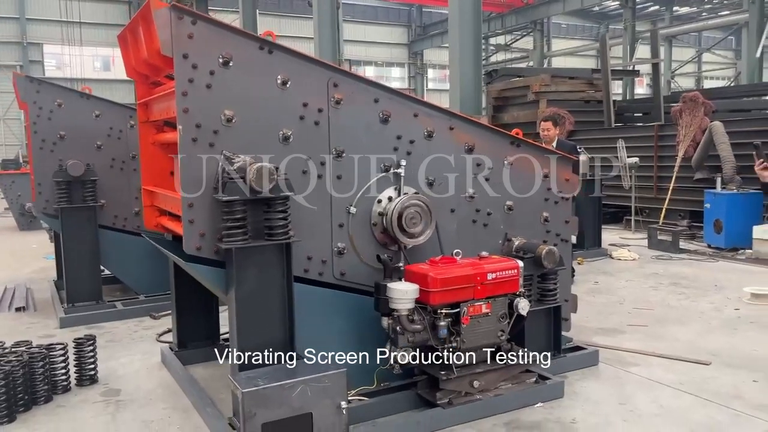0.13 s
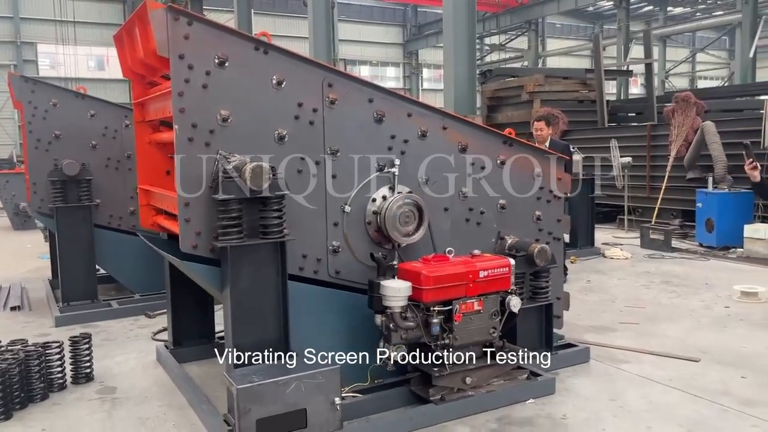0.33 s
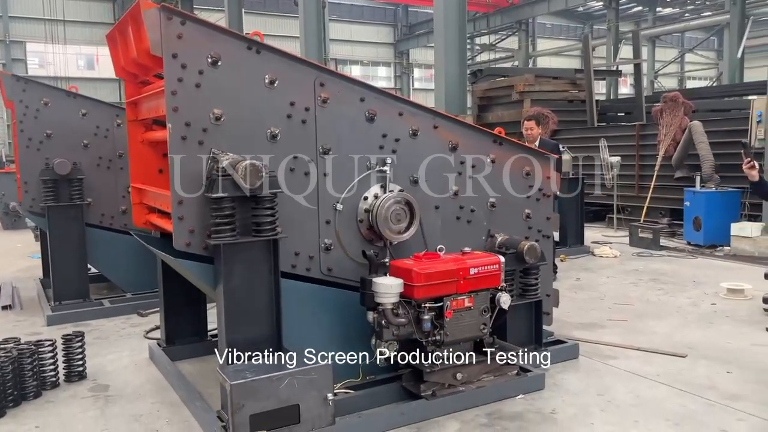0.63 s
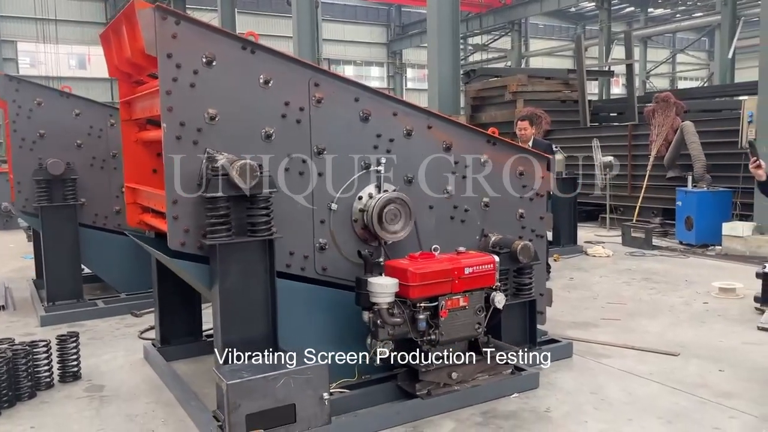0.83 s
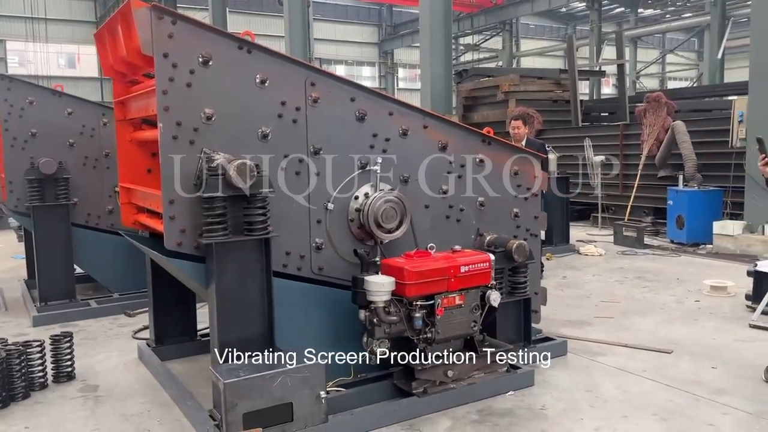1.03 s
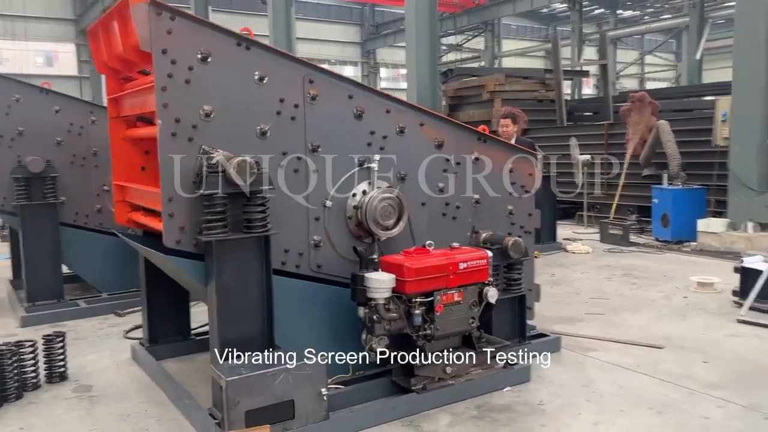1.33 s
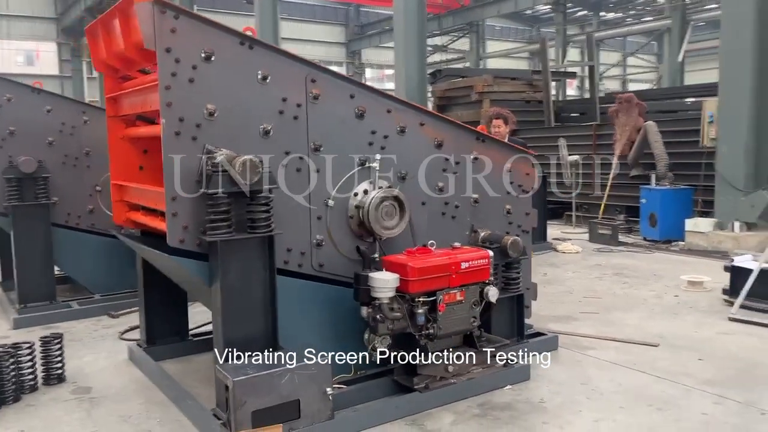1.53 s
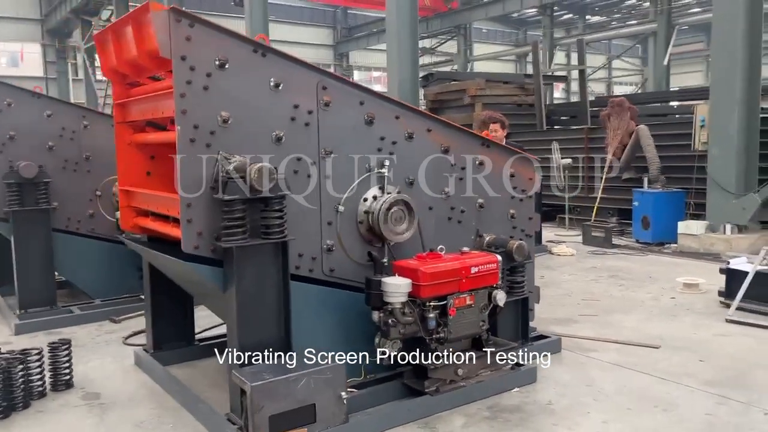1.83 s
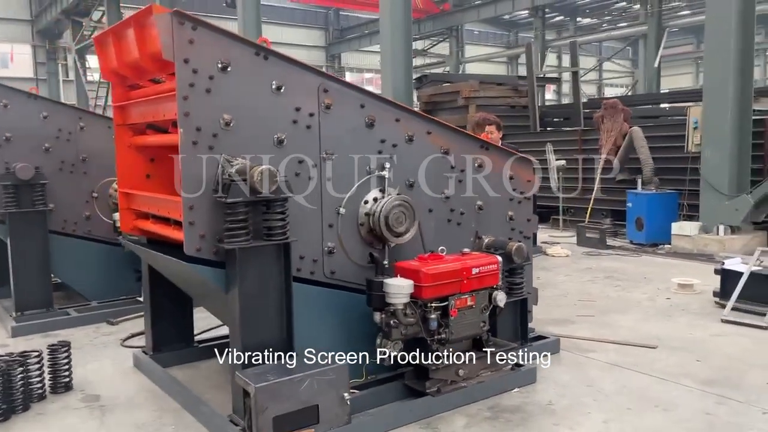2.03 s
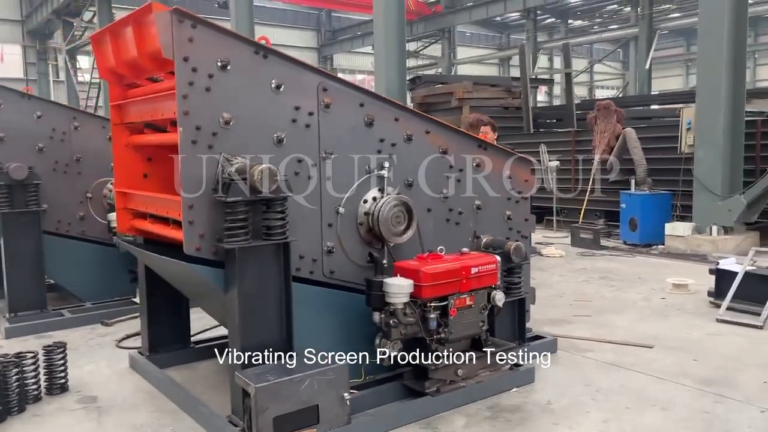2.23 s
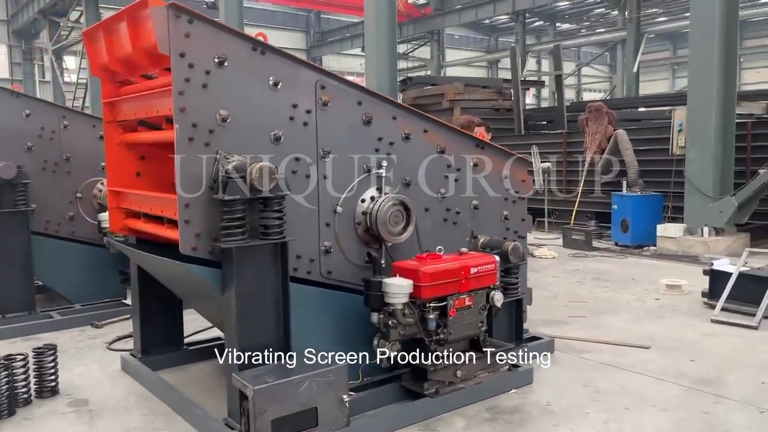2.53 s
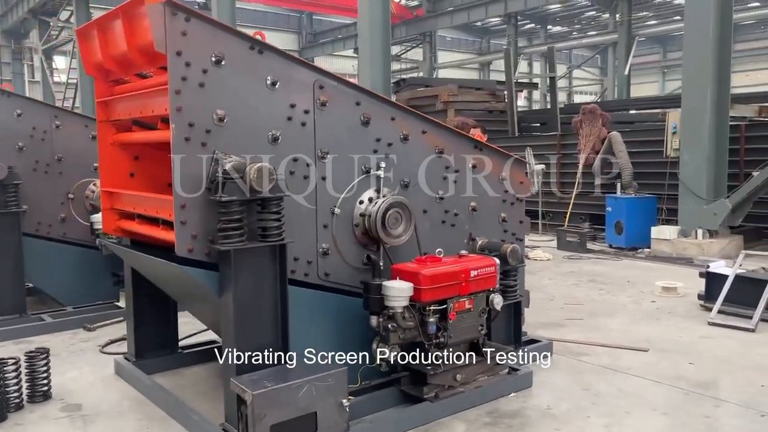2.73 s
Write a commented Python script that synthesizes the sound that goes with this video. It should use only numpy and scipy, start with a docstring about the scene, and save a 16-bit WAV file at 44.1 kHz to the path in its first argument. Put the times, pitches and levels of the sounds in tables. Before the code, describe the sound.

Close stereo microphone in an industrial hall: continuous fast diesel chugging, metallic valve clacks and gritty exhaust puffs, with steel decks rattling and loose parts pinging behind; the tone shifts slightly midway, without any pause.

```python
"""Diesel engine driving a vibrating screen

A one-cylinder diesel engine drives a large vibrating screen in a factory hall, close to a two-port microphone.
Each firing rings iron modes (knock, clack) and gates shaped noise (cracks, exhaust hiss); the exhaust
booms as pipe resonances, the intake thumps just before the firing, and the valve gear clacks after it.
Patchy noise makes the screen's steel rattle and rumble behind, with pings from loose parts.
Decaying noise convolved with the sharp sounds makes the hall's answer."""
import sys
import numpy as np
from scipy import signal
from scipy.fft import rfft, irfft, next_fast_len
from scipy.io import wavfile
from scipy.ndimage import uniform_filter1d, map_coordinates

SR = 44100
rng = np.random.default_rng(int(sys.argv[2]) if len(sys.argv) > 2 else 0)


def store_wav(level_fs):
    """Save 16-bit WAV to argv[1]."""
    pcm = np.round(np.clip(np.atleast_2d(level_fs), -1, 1) * 32767)
    wavfile.write(sys.argv[1], SR, pcm.T.astype(np.int16))


N = 127449  # length [samples]
LEAD = SR // 10  # room for events that begin before time zero [samples]
TIME = np.arange(N) / SR


def amp(db):
    """Decibel law: a level in dB becomes an amplitude ratio."""
    return 10 ** (np.asarray(db) / 20)


def unit(x):
    """Normalisation by effective value: x scaled to rms 1."""
    return x / np.sqrt(np.mean(x ** 2) + 1e-20)


def along(points, hz):
    """Logarithmic frequency scale: (Hz, value) points interpolated along it."""
    point_hz, value = np.transpose(points)
    return np.interp(np.log(hz + 1), np.log(point_hz + 1), value)


def over_time(points):
    """Linear interpolation of (s, value) points at every sample."""
    return np.interp(TIME, *np.transpose(points))


def wobble(rate):
    """Band-limited fluctuation: a smooth random curve with rate knots a second."""
    knots = rng.standard_normal(int(N * rate / SR) + 4)
    return map_coordinates(knots, [np.arange(N) * rate / SR])


def filtered(x, response):
    """Linear filtering: the spectrum of x times a complex response of frequency."""
    size = next_fast_len(N + SR // 2)
    spectrum = rfft(x, size) * response(np.fft.rfftfreq(size, 1 / SR))
    return irfft(spectrum, size)[..., :N]


# Left-right likeness of the noises: (frequency [Hz], correlation [-1 to 1])
LIKENESS = [(60, 1), (300, 0.97), (600, 0.83), (1000, 0.86), (1400, 0.4), (2500, 1), (4500, 0.39),
            (6500, 0.8), (8300, 1), (10200, 0.95), (12500, 1), (15000, 0.38)]


def rush(spectrum, patchy_db):
    """Partial coherence: shaped stereo noise of rms 1, with random gain in patches of time and frequency."""
    z = signal.stft(rng.standard_normal((2, N)), nperseg=512)[2]
    field = uniform_filter1d(rng.standard_normal(z.shape[1:]), 5, 0)
    field = uniform_filter1d(field, 6, 1)
    pair = signal.istft(z * amp(patchy_db * unit(field)), nperseg=512)[1][:, :N]

    def mid_side_response(hz):
        # mid and side powers in this ratio give the wanted correlation
        turn = np.arccos(np.clip(along(LIKENESS, hz), -1, 1)) / 2
        return amp(along(spectrum, hz)) * [np.cos(turn), np.sin(turn)]

    mid, side = filtered(pair, mid_side_response)
    return unit(np.array([mid + side, mid - side]))


# The microphone's drift past the engine: (time [s], share of the way [0 to 1])
DRIFT = [(0, 0.02), (1.3, 0.18), (1.7, 0.63), (2.2, 0.92), (2.89, 0.83)]


def passed(s):
    """Moving receiver: how far the microphone has drifted at the given times."""
    return np.interp(s, *np.transpose(DRIFT))


# Firings, with relative levels that each sound's own gains add to:
# (time [s], knock [dB], crack [dB], exhaust hiss [dB], exhaust boom [dB])
FIRINGS = [(-0.0372, -25, -47, -47, -28), (0.0325, -27, -40.5, -43.5, -29), (0.1024, -25, -37.5, -40, -28),
           (0.1723, -26, -36, -40, -27), (0.2424, -24, -34.5, -39, -26), (0.3121, -23, -35.5, -38.5, -25.5),
           (0.3818, -24, -33, -37.5, -27), (0.4516, -25, -37, -42.5, -26), (0.5211, -28, -43.5, -47, -25),
           (0.5906, -27.5, -41, -45.5, -29), (0.6604, -27.5, -38.5, -48, -28),
           (0.7306, -26, -38, -47, -26.5), (0.8007, -27, -39, -44, -27.5),
           (0.8706, -25.5, -38.5, -42.5, -27), (0.9405, -24.5, -37.5, -41, -27),
           (1.0112, -23.5, -32, -38.5, -26), (1.0813, -23, -33.5, -38.5, -27),
           (1.1507, -23, -31.5, -39.5, -26.5), (1.2202, -24, -35.5, -40, -25.5),
           (1.2898, -23.5, -36, -40.5, -28), (1.3593, -26.5, -34.5, -44, -23), (1.4291, -30, -45, -58, -31),
           (1.4984, -30, -37.5, -55, -27), (1.5683, -26, -36, -48.5, -27),
           (1.6386, -26.5, -34, -42.5, -26.5), (1.7081, -26.5, -37, -42, -29),
           (1.7782, -28.5, -35, -39, -27.5), (1.8486, -26.5, -33, -39.5, -27.5),
           (1.9189, -25.5, -32.5, -37.8, -26), (1.9876, -27.5, -37.5, -39.5, -26.5),
           (2.0577, -25, -34, -41, -26.5), (2.1271, -26, -34, -38.5, -26), (2.1966, -25.5, -35, -40.5, -25),
           (2.266, -27.5, -35, -41, -28), (2.3359, -33.5, -54, -54, -30), (2.4042, -30, -37.5, -49, -27),
           (2.4746, -29, -38, -48, -30), (2.5447, -30.5, -35.5, -45, -27), (2.6141, -29, -39, -41.5, -27),
           (2.6837, -29, -38, -37.5, -28), (2.7542, -27.5, -32.5, -38.5, -26.5),
           (2.8241, -29, -33, -38, -25.5)]


def each_firing(shape, column, strikes, scatter_db=0, passed_db=0):
    """Superposition: a copy of shape for every firing and (delay s, dB) strike, at the column's level."""
    rows = np.array(FIRINGS)
    firing_s = rows[:, 0]
    level_db = rows[:, column] + scatter_db * rng.standard_normal(len(rows)) + passed_db * passed(firing_s)
    blows = np.zeros(N + 2 * LEAD)
    for delay_s, db in strikes:
        blows[np.round((firing_s + delay_s) * SR).astype(int) + LEAD] += amp(level_db + db)
    return signal.fftconvolve(blows, shape)[LEAD:LEAD + N]


def fade(attack_s, t60_s):
    """Exponential decay behind a smooth rise."""
    t = np.arange(SR // 2) / SR
    return (1 - np.exp(-(t / attack_s) ** 2)) * amp(-60 * t / t60_s)


def ringing(modes, column, strikes, attack_s, scatter_db, passed_db=None):
    """Modal superposition: firings excite damped sines, each mode's level scattering on its own."""
    t = np.arange(SR // 2) / SR
    rise = 1 - np.exp(-t / attack_s)
    changes = np.zeros(len(modes)) if passed_db is None else passed_db
    total = np.zeros(N)
    for (hz, db, t60), change in zip(modes, changes):
        mode = amp(db - 60 * t / t60) * rise * np.sin(2 * np.pi * hz * t)
        total += each_firing(mode, column, strikes, scatter_db, change)
    return total


def clank(s, level_db, modes, attack_s, scatter_db, detune):
    """Impact excitation: short damped metal modes with new level, pitch and phase at every blow."""
    t = np.arange(SR // 16) / SR
    hz, db, t60, change = np.transpose(modes)[..., None]
    rise = 1 - np.exp(-(t / attack_s) ** 2)
    out = np.zeros(N + 2 * LEAD)
    for start, size_db in zip(s, level_db):
        level, pitch, phase = rng.standard_normal((3, len(modes), 1))
        gain = amp(size_db + db + change * passed(start) + scatter_db * level - 60 * t / t60)
        ring = (gain * np.sin(2 * np.pi * (hz * (1 + detune * pitch) * t + phase))).sum(0)
        out[round(start * SR) + LEAD:][:len(t)] += ring * rise
    return out[LEAD:LEAD + N]


# Decay of the hall's answer: (frequency [Hz], t60 [s])
HALL = [(100, 0.95), (1000, 1), (5000, 0.033), (15000, 0.039)]


def hall(x):
    """Reverberation: x convolved with stereo noise whose every frequency dies at its own speed."""
    hz, t, z = signal.stft(rng.standard_normal((2, SR // 2)), SR, nperseg=256)
    decay = amp(-60 * t / along(HALL, hz)[:, None])
    tail = signal.istft(z * decay, SR, nperseg=256)[1]
    delayed = np.pad(x, (700, 0))[None]  # the answer starts 700 samples late
    answer = signal.fftconvolve(delayed, tail / np.linalg.norm(tail[0]), axes=1)[:, :N]
    return amp(-20.5) * answer


# Noise spectrum of the shaken frame: (frequency [Hz], relative density [dB])
RUMBLE = [(25, -37), (45, -50), (70, -2), (110, -2), (150, -4.5), (200, -5.5), (260, -10), (300, -3.5),
          (360, -11), (550, -20), (900, -47.5)]


def rumble():
    """Forced vibration: the shaken frame as low noise with a slightly wavering level."""
    return amp(-34.5 + 0.3 * wobble(6.93)) * rush(RUMBLE, patchy_db=1.5)


# Noise spectrum of the steel decks: (frequency [Hz], relative density [dB])
RATTLE = [(300, -13.5), (450, -3), (620, -4.5), (850, 1.5), (1200, -6), (2000, -4.5), (3200, -8.5),
          (5000, -16), (8000, -26.5), (11000, -30), (15500, -37)]
# Slow course of the rattle, before a common lift: (time [s], level [dB])
RATTLE_LEVEL = [(0.0, -39.5), (1.3, -39), (1.76, -39.5), (2.01, -39), (2.46, -39), (2.89, -37)]


def rattle():
    """Amplitude modulation: dense steel noise, loudest early in each engine cycle."""
    lift_db, swing_db, peak_share_of_cycle = 3.5, 1.5, 0.31
    cycle = np.interp(TIME, np.array(FIRINGS)[:, 0], np.arange(len(FIRINGS)))
    level_db = over_time(RATTLE_LEVEL) + lift_db
    level_db = level_db + 1.66 * wobble(39.71) + 1.1 * wobble(400)
    level_db = level_db + swing_db * np.cos(2 * np.pi * (cycle - peak_share_of_cycle))
    return amp(level_db) * rush(RATTLE, patchy_db=1.5)


def ticks():
    """Random impacts: loose bolts and mesh ping as short damped sines at random moments."""
    per_s, middle_hz, spread, cycles_to_60_db, level_db = 130, 2600, 0.243, 17, -47
    moment, chance = rng.random((int(per_s * N / SR), 2)).T[..., None]
    t = np.arange(SR // 40) / SR
    # the logistic law scatters the pitch about its middle
    hz = np.clip(middle_hz * np.exp(spread * np.log(chance / (1 - chance)) / 2), 800, 9000)
    decay = amp(level_db - 60 * t * hz / cycles_to_60_db)
    pings = decay * (1 - np.exp(-t / 0.0012)) * np.sin(2 * np.pi * hz * t)
    at = (moment * N).astype(int) + np.arange(len(t))
    return np.bincount(at.ravel(), pings.ravel(), N + len(t))[:N]


# Modes of a steel panel: (frequency [Hz], level [dB], t60 [s])
PANEL = [(729, 3, 0.12), (770, 2.5, 0.13), (836, -6.5, 0.044)]
# Its blows, late in the cycle: (delay after the firing [s], level [dB])
PANEL_STRIKES = [(.0305, 1.5), (.0445, -7.5)]
# Its course as the microphone drifts past: (time [s], level over the knock [dB])
PANEL_LEVEL = [(0, -20), (1.3, -16), (1.7, -8), (2.2, -7.5), (2.89, -11.5)]


def panel():
    """Modal ringing: a steel panel that comes forward as the microphone drifts past it."""
    ring = ringing(PANEL, column=1, strikes=PANEL_STRIKES, attack_s=0.0039, scatter_db=0)
    return amp(over_time(PANEL_LEVEL)) * ring


# Hums of the casing: (frequency [Hz], level [dB], change once passed [dB])
SHELL = [(746, -54, 8.5), (820, -46, -10)]


def shell():
    """Narrow-band vibration: two casing hums that fill the gaps between knocks, wavering and wandering."""
    way = passed(TIME)
    hum = np.zeros(N)
    for hz, db, change in SHELL:
        gain = np.sqrt(2) * amp(db + change * way + 2 * wobble(8.98))
        phase = 2 * np.pi * np.cumsum(hz + 2.5 * wobble(6)) / SR
        hum += gain * np.sin(phase)
    return hum


# Intake resonances: (frequency [Hz], level over the exhaust boom column [dB], t60 [s])
INTAKE = [(56, 3.8, .14), (108, 1.2, .1), (171, -7, .2)]


def intake():
    """Air-column resonance: the intake sucks just before each firing."""
    return ringing(INTAKE, column=4, strikes=[(-.0025, 0)], attack_s=.0003, scatter_db=2.2)


# Exhaust pipe resonances: (frequency [Hz], level over the exhaust boom column [dB], t60 [s])
PIPE = [(60.4, -1.5, .4), (81.5, 10.3, .184), (146, -5, .4), (177.6, 10.5, .06), (212, -8.5, .4),
        (244, -16, .4)]


def exhaust_boom():
    """Pipe resonance: each puff of exhaust excites the low modes of the pipe."""
    return ringing(PIPE, column=4, strikes=[(.0162, 0)], attack_s=.006, scatter_db=0.77)


# Noise spectrum of the exhaust jet: (frequency [Hz], relative density [dB])
HISS = [(300, -36), (1200, -14), (3000, 7), (5000, -10.5), (7500, 5), (10500, -4), (14000, -6),
        (14700, -16), (15500, -30)]


def exhaust_hiss():
    """Jet noise: a sharp burst as the exhaust opens, trailing off into a longer, weaker flow."""
    attack_s = 0.0061
    flow = fade(attack_s, t60_s=0.039) + amp(-13) * fade(attack_s, t60_s=0.1)
    gate = each_firing(flow, column=3, strikes=[(0.013, 0)])
    return amp(16 + wobble(650)) * gate * rush(HISS, patchy_db=3.5)


# The exhaust valve gear takes up its play: (time [s], level [dB]); sounded 1.5 ms ahead of these times
VALVE_CLACKS = [(0.0542, -39), (0.125, -50), (0.1956, -40), (0.2647, -34.5), (0.3314, -36), (0.4026, -36),
                (0.471, -52), (0.5414, -48), (0.6132, -42), (0.6785, -41), (0.7476, -39), (0.8207, -48),
                (0.8917, -36), (0.9615, -34), (1.0314, -34), (1.1013, -44), (1.1706, -37), (1.2409, -34),
                (1.3102, -36), (1.3798, -33), (1.451, -45), (1.5199, -45), (1.5897, -46), (1.659, -41),
                (1.728, -35), (1.8007, -40), (1.869, -32), (1.9389, -33), (2.0093, -31), (2.0787, -32.5),
                (2.1486, -36), (2.217, -30), (2.2862, -40), (2.355, -48), (2.4251, -35.5), (2.4946, -35),
                (2.5645, -33), (2.6345, -31.5), (2.7041, -40), (2.774, -44), (2.8442, -29.5)]
# Modes of the valve gear: (frequency [Hz], level over the clack [dB], t60 [s], change once passed [dB])
VALVE = [(1543, 0.5, 0.072, -10.5), (2164, -2, 0.052, -1.5), (2658, 0.5, 0.029, 5.5),
         (3620, -12.5, 0.038, -1), (4080, -6, 0.043, -1), (4530, -4.5, 0.027, -2), (5130, -11, 0.025, -3),
         (6050, -5, 0.03, -5), (6800, -21, 0.014, 3), (10300, -11, 0.013, 4), (11300, -6, .018, -1),
         (11800, -3, .018, 2), (13000, -2, 0.022, 1), (13900, -9, .018, .3)]


def valve():
    """Impact across a clearance: a bright second clack as the exhaust opens."""
    s, db = np.transpose(VALVE_CLACKS)
    return clank(s - .0015, db, VALVE, attack_s=.0012, scatter_db=2, detune=.02)


# Modes of the cylinder head: (frequency [Hz], level over the crack [dB], t60 [s], change once passed [dB])
HEAD = [(1520, 6.5, 0.031, -1.5), (1980, -9.5, 0.024, 14), (2120, -6, 0.041, 9.5), (2432, 8.5, 0.041, -3),
        (2973, 2.5, 0.036, 5.5), (3350, 1.5, 0.04, 1.5), (3920, -17, .03, -7), (4385, -2, 0.036, 5),
        (4880, -4, 0.025, 1.5)]


def head():
    """Impulsive excitation: combustion rings the cylinder head as a metallic clack."""
    rows = np.array(FIRINGS)
    return clank(rows[:, 0] + 0.001515, rows[:, 2], HEAD, attack_s=0.0019, scatter_db=2.5, detune=0.0096)


def snap():
    """Heavily damped resonance: the hard click at the peak of each combustion."""
    modes = [(2600, 6, 0.0021)]  # (Hz, dB over the crack, t60 s)
    return ringing(modes, column=2, strikes=[(0.0059, 0)], attack_s=.00008, scatter_db=3.0)


# Noise spectrum of the cracks: (frequency [Hz], relative density [dB])
CRACK = [(300, -32), (600, -27), (800, 4), (1100, -5.5), (1500, -0.5), (3000, -0.5), (5000, -10),
         (8500, -7), (10500, -14), (14800, -19.5), (15500, -25)]
# Gritty cracks within one cycle: (delay after the firing [s], level [dB])
CRACKS = [(-.0018, -2), (0.0373, -16), (0.057, -30.5)]


def cracks():
    """Gated noise: gritty bursts that go with the knock and the later contacts."""
    gate = each_firing(fade(0.0035, t60_s=0.061), column=2, strikes=CRACKS)
    return amp(11.5 + 1.5 * wobble(600)) * gate * rush(CRACK, patchy_db=-3.5)


# Modes of the engine block: (frequency [Hz], relative level [dB], t60 [s])
BLOCK = [(700, -7.5, .14), (745, -15, .3), (799.4, -5, .16), (826, 5, .11), (885, 14, .03), (960, 14, .022),
         (1010, 10, .031), (1053.5, -5, .126), (1348, 8.5, .018), (1400, -8, .08), (1545, -7, .08),
         (1710, -8, .05)]
# Change of each block mode once the microphone has passed: (change [dB])
BLOCK_PASSED_DB = [-17, -2, -3, 0.5, -2, -1.6, 0.7, -4.5, -5.5, 8, -1, 9]
# Contacts in the block within one cycle: (delay after the firing [s], level [dB])
CONTACTS = [(.0004, -13.5), (.00243, 0), (.01608, -12), (.03319, -15.5), (.04738, -21)]


def block():
    """Modal ringing: combustion knock and the later valve contacts excite the iron block."""
    iron = ringing(BLOCK, column=1, strikes=CONTACTS, attack_s=.004, scatter_db=0.44,
                   passed_db=BLOCK_PASSED_DB)
    return amp(-2.5) * iron


def scene():
    """Superposition of the screen, the engine and the hall's answer to the sharp sounds."""
    small_parts = ticks() + panel() + shell()
    engine = exhaust_hiss() + valve() + head() + snap() + cracks() + block()
    sharp = small_parts + engine
    breathing = exhaust_boom() - intake()
    return hall(sharp[0]) + rumble() + rattle() + breathing + sharp


# Phase lead of the left port over the right: (frequency [Hz], lead [rad])
LEFT_LEADS = [(0, 0), (1150, .2), (1380, -1.1), (1650, 0), (2200, .1), (3200, 1.2), (4500, .5), (5600, -.2),
              (7000, -1.7), (7800, -3.1), (9000, -3.3), (10000, -5), (11000, -6), (12000, -6.3),
              (15500, -6.5)]
# Level of the left port over the right: (frequency [Hz], difference [dB])
LEFT_LOUDER = [(60, 0.5), (110, 1.5), (200, 2), (380, 1.0), (700, 2.5), (1290, 4.5), (2380, -0.5),
               (4400, 5), (8120, 0), (15000, 0)]
# Fall at the top of the band: (frequency [Hz], gain [dB])
TREBLE_FALL = [(14900, 0), (15300, -15), (15750, -27)]


def record(dry):
    """Two-port reception: bass cut, faint circuit rumble, ports unlike in phase and level, a sharp band end."""
    low_cut_hz, top_hz = 52, 15750
    low_cut = signal.butter(5, low_cut_hz, "high", fs=SR, output="sos")

    def steeper(hz):
        return hz ** 16 / (hz ** 16 + (.93 * low_cut_hz) ** 16)

    def ports(hz):
        # each port takes half of the difference, in opposite senses
        half = amp(along(LEFT_LOUDER, hz) / 2) * np.exp(.5j * along(LEFT_LEADS, hz))
        return np.array([half, 1 / half]) * amp(along(TREBLE_FALL, hz)) * (hz < top_hz)

    heard = filtered(signal.sosfilt(low_cut, dry), steeper)
    circuit = rush([(5, -2), (45, 5), (60, -40), (200, -90)], patchy_db=0.0)  # (Hz, relative dB)
    return filtered(heard + amp(-51.5) * circuit, ports)


dry = scene()
out = record(dry)
store_wav(out)
```